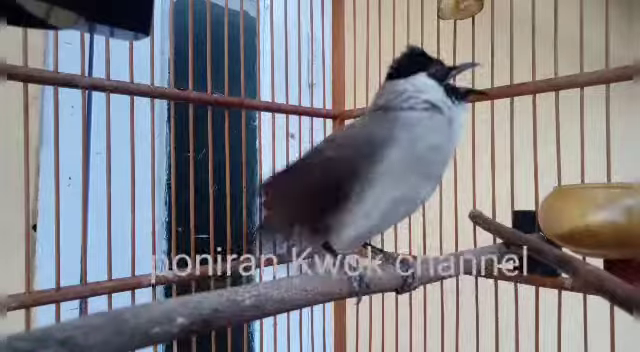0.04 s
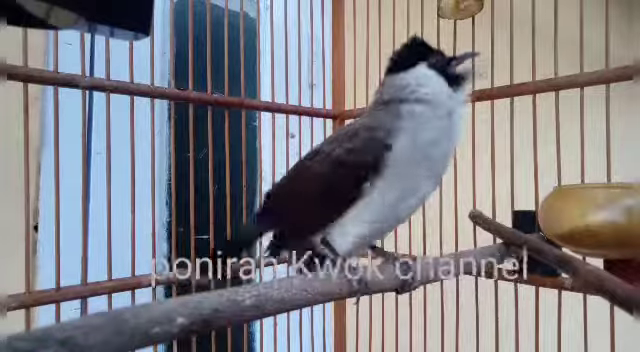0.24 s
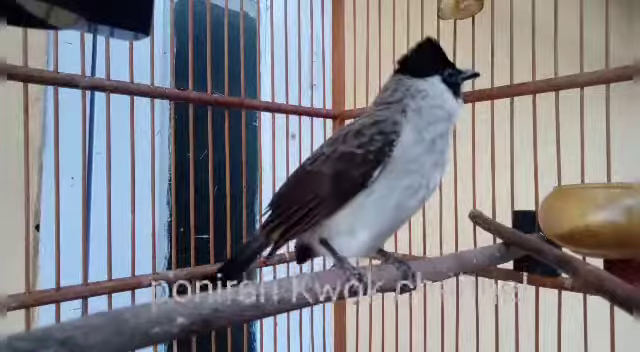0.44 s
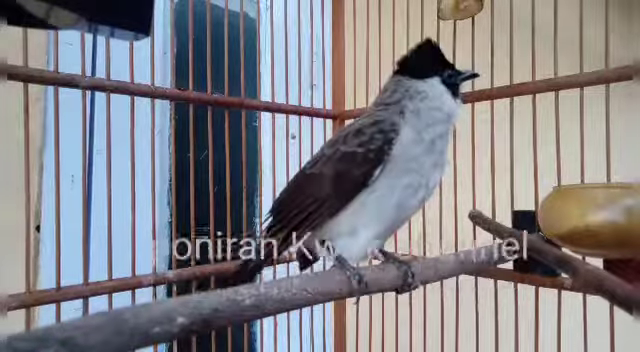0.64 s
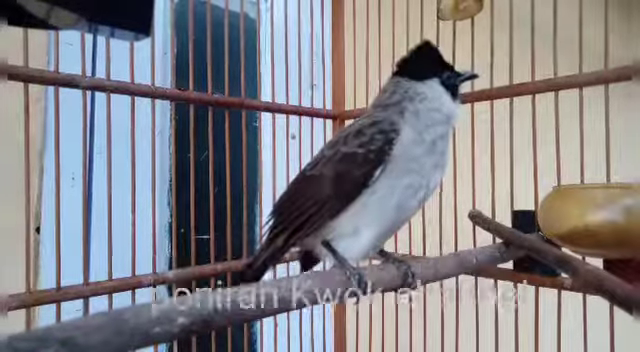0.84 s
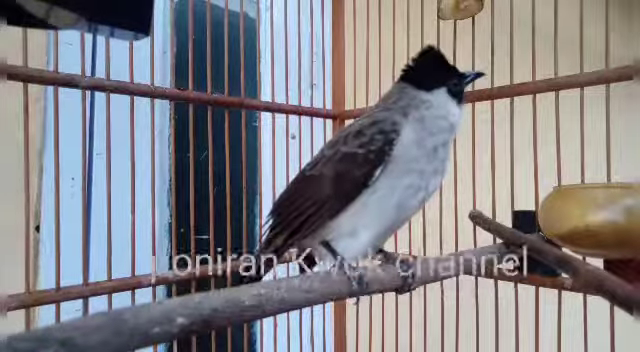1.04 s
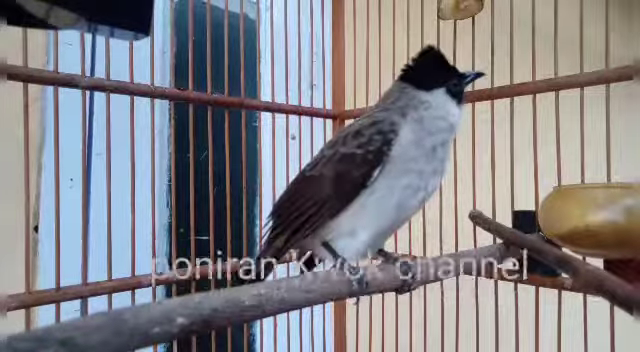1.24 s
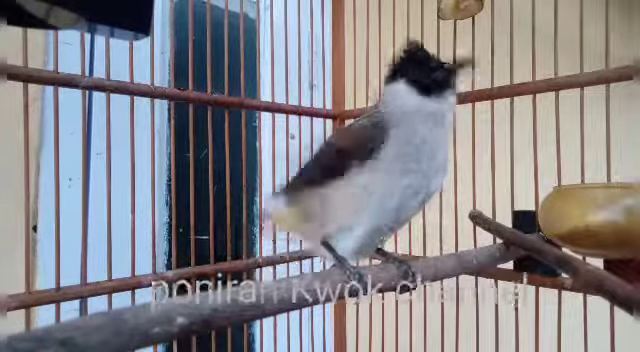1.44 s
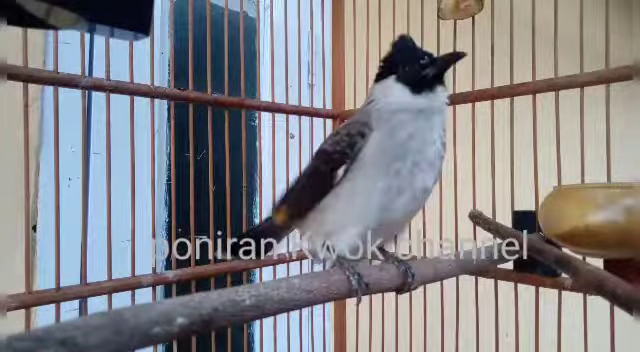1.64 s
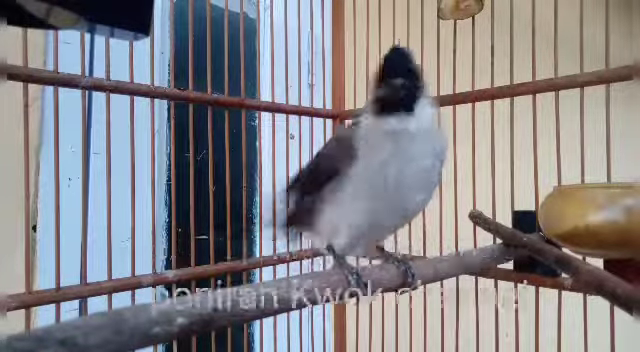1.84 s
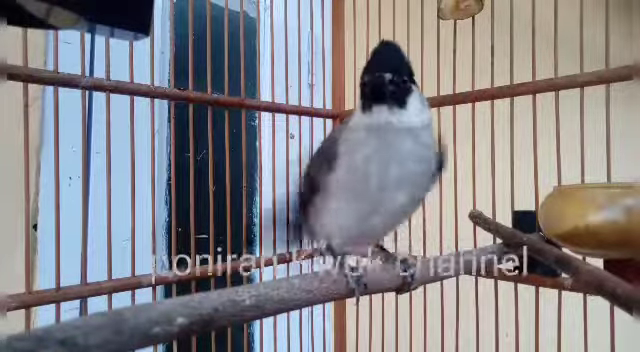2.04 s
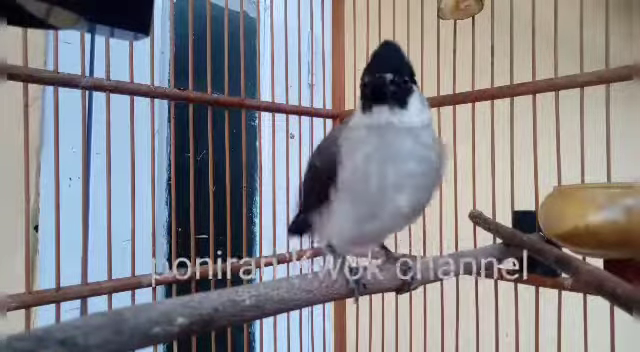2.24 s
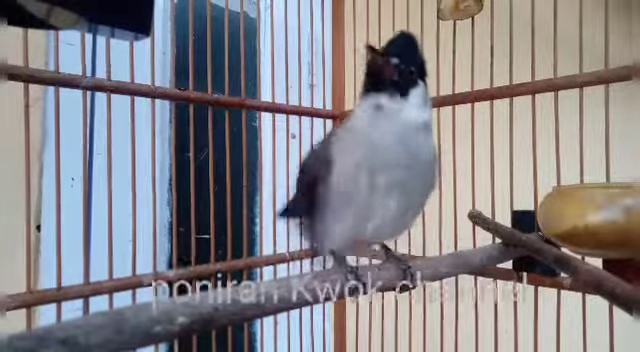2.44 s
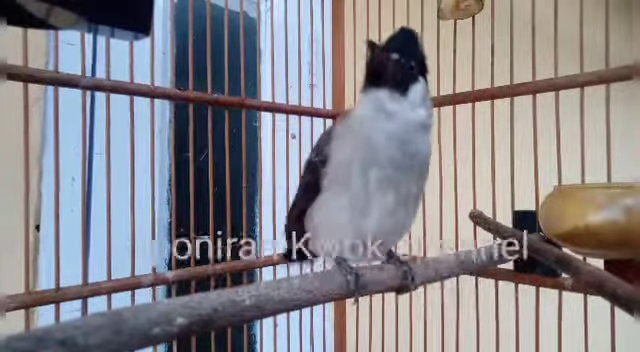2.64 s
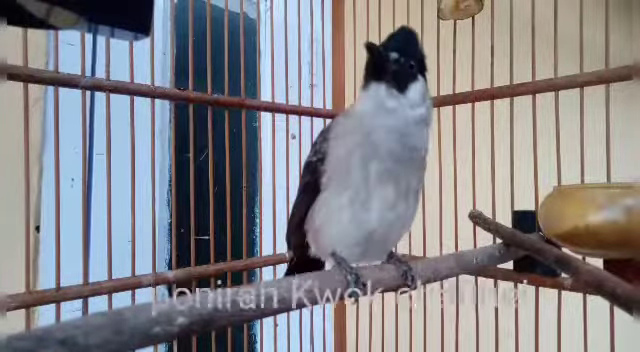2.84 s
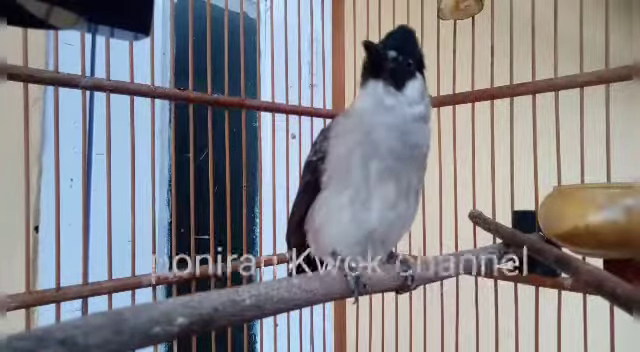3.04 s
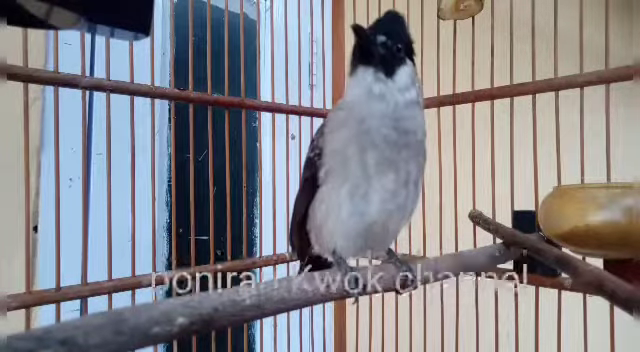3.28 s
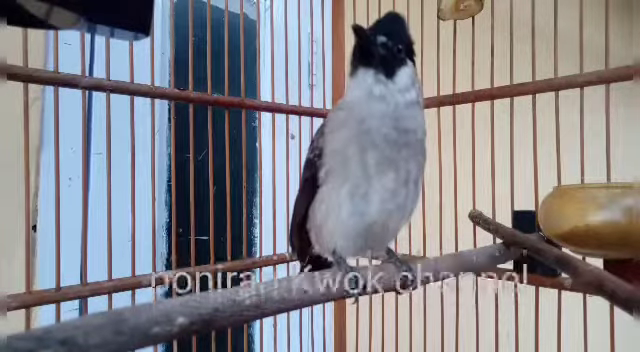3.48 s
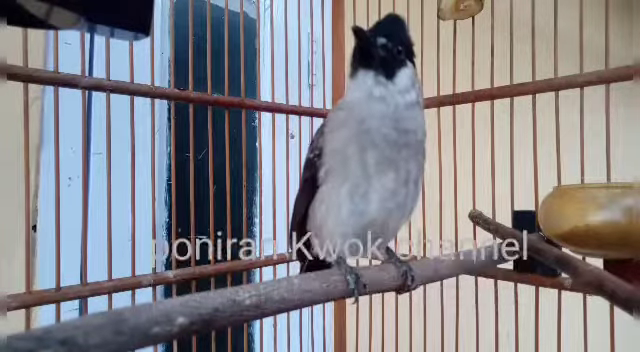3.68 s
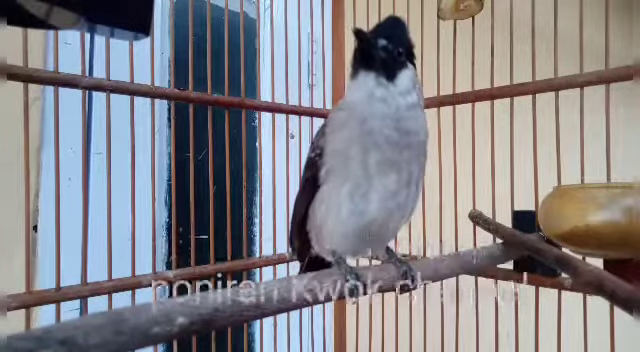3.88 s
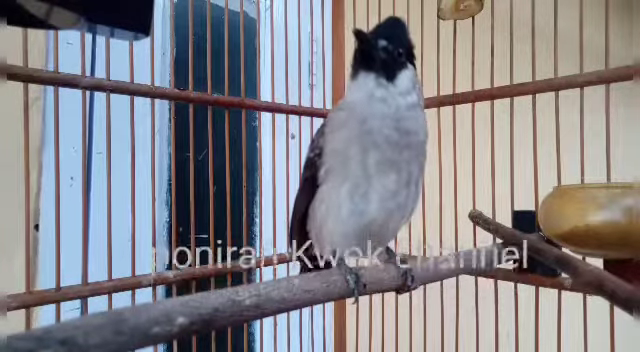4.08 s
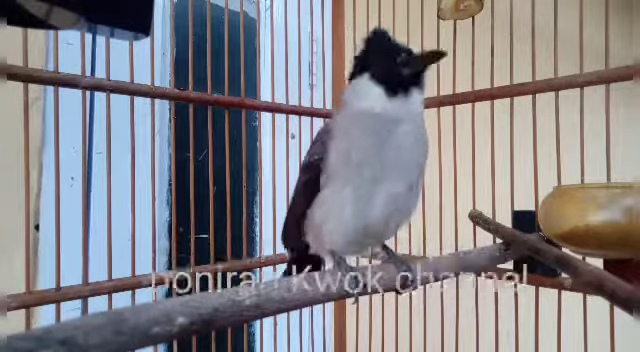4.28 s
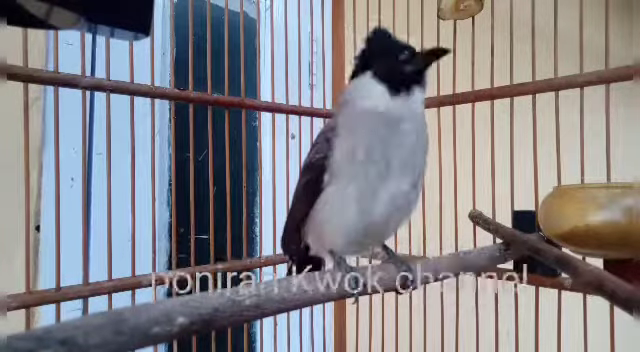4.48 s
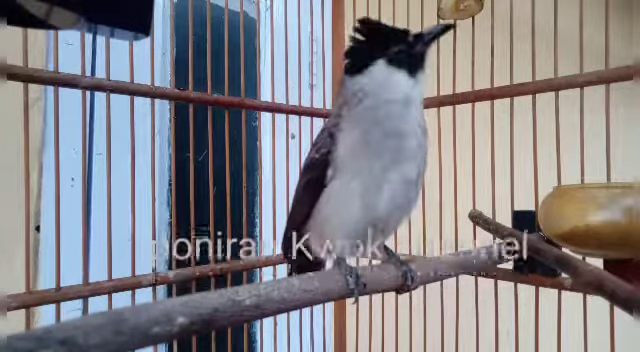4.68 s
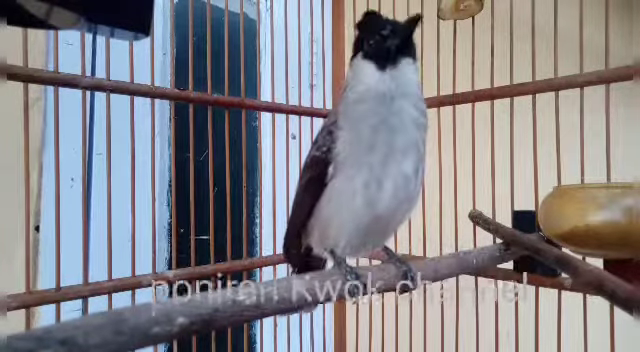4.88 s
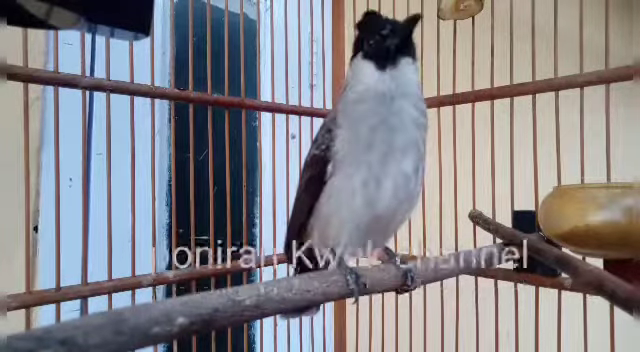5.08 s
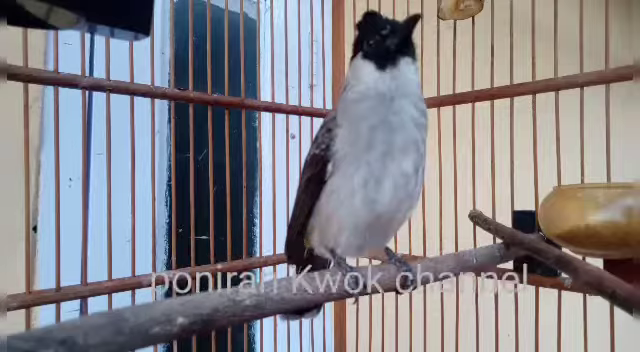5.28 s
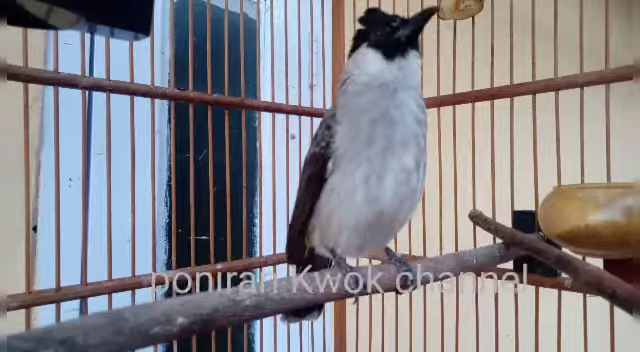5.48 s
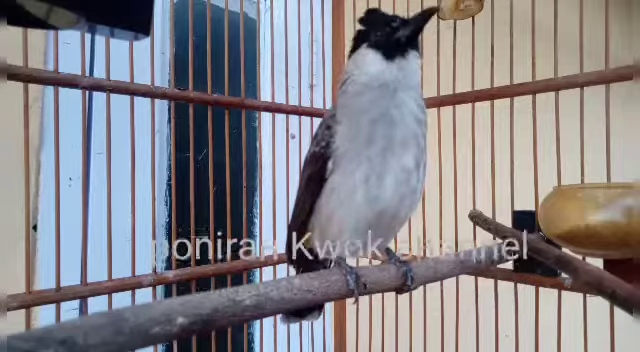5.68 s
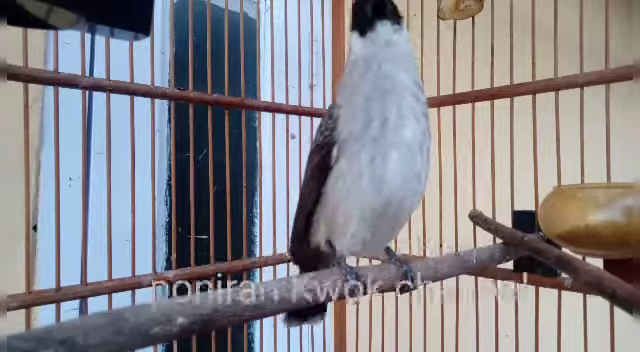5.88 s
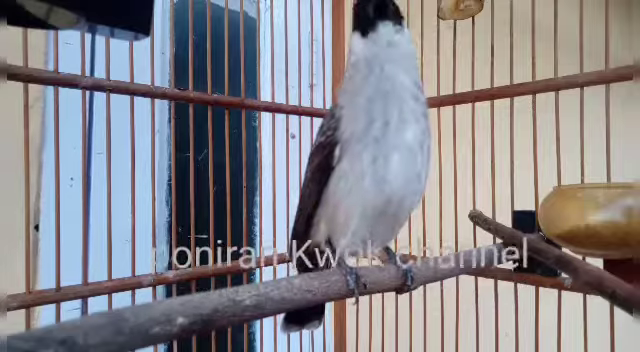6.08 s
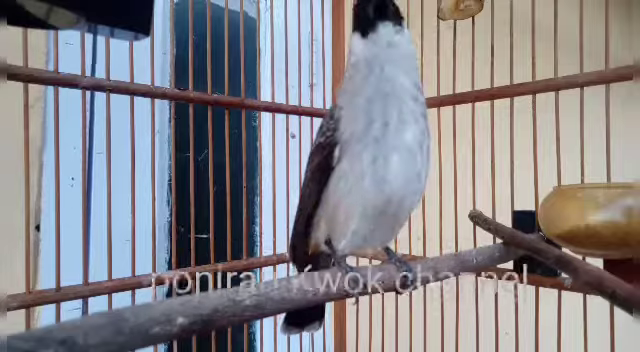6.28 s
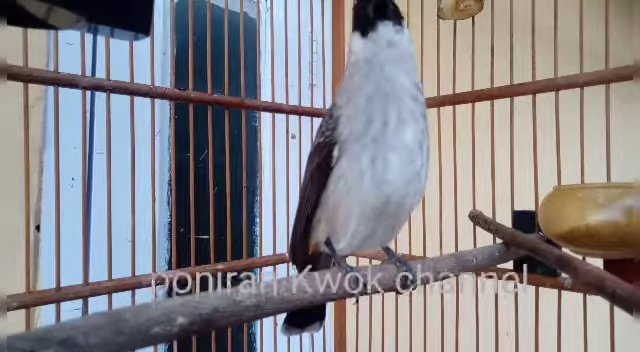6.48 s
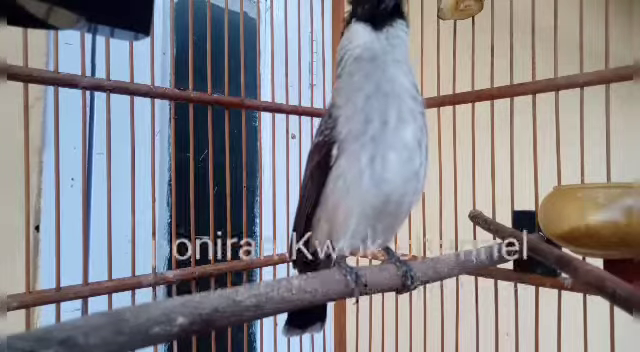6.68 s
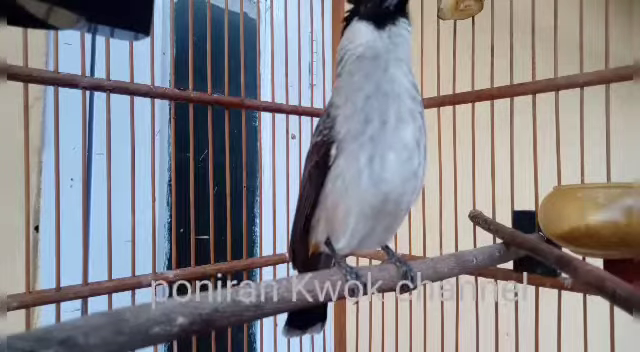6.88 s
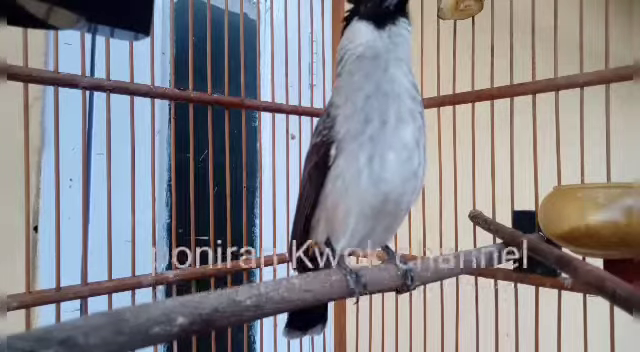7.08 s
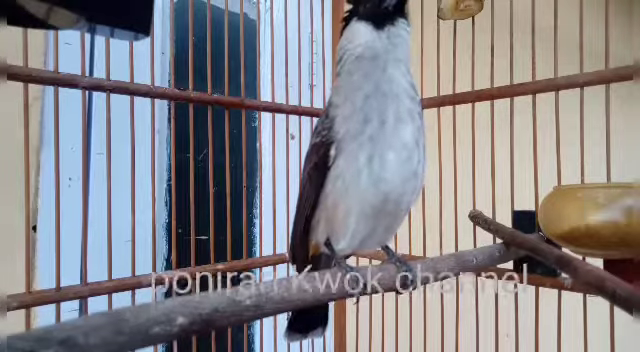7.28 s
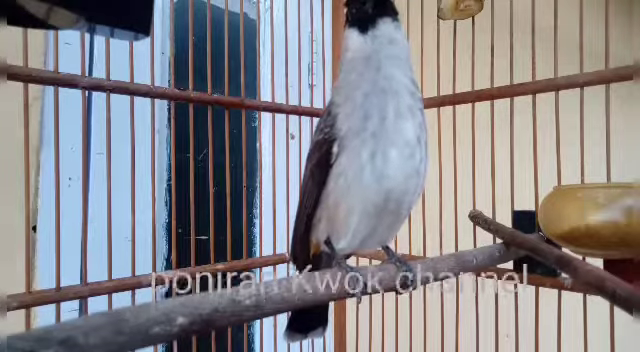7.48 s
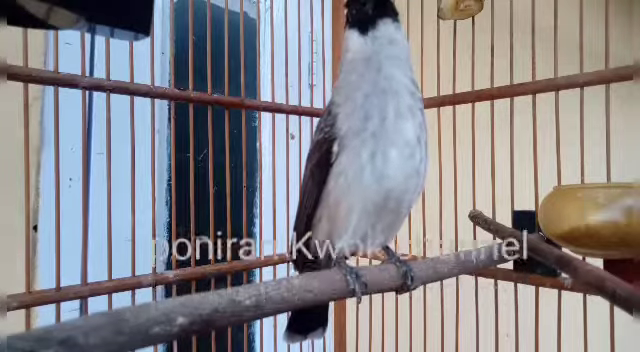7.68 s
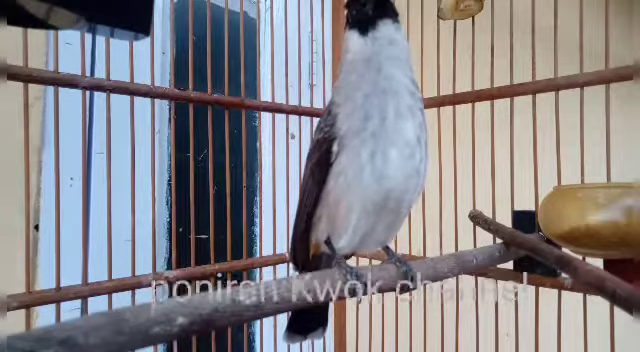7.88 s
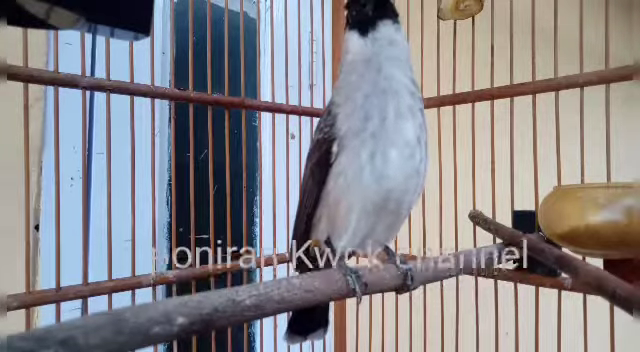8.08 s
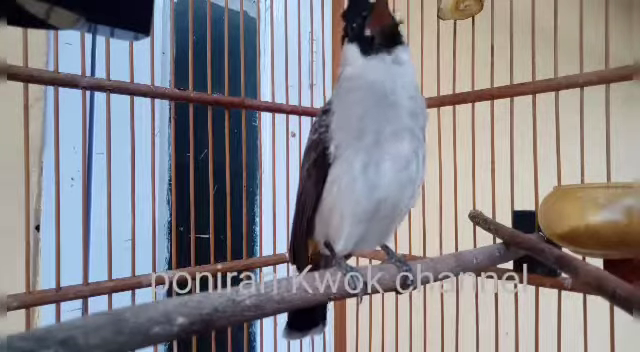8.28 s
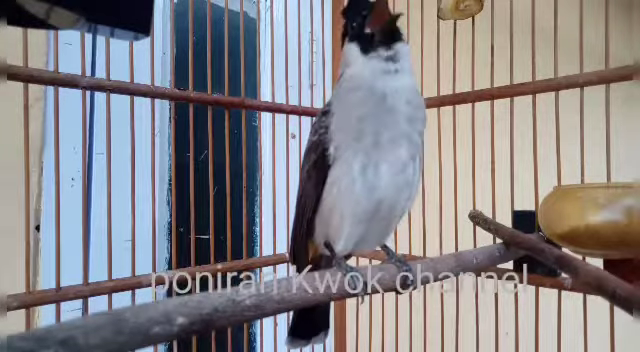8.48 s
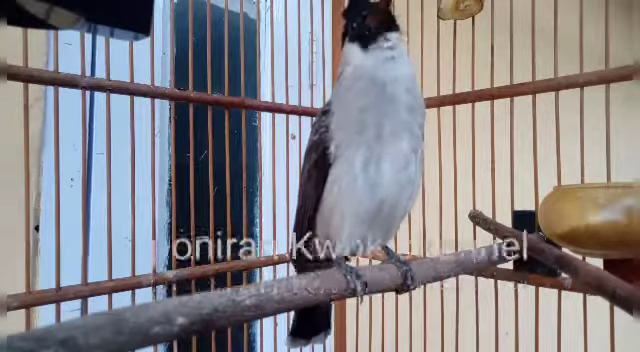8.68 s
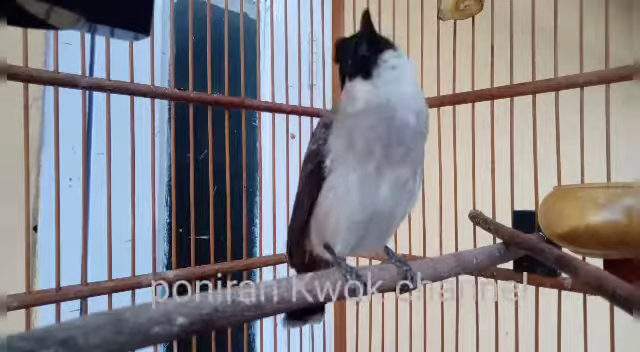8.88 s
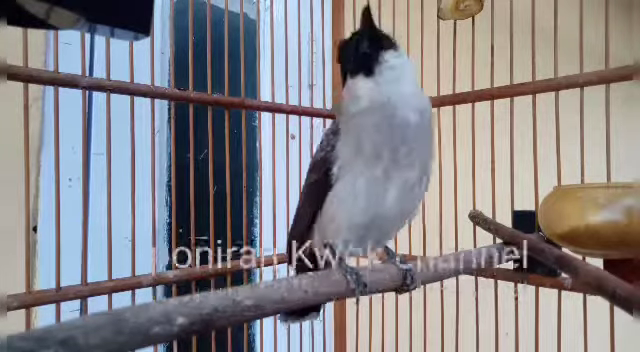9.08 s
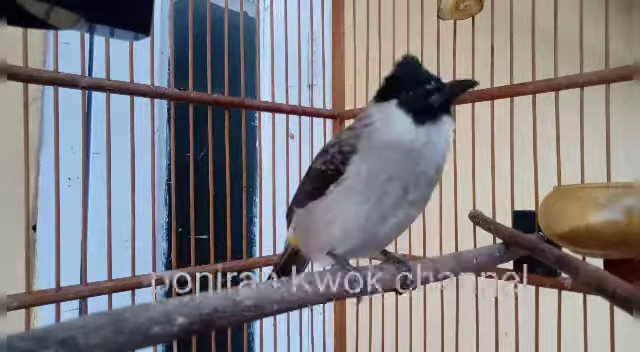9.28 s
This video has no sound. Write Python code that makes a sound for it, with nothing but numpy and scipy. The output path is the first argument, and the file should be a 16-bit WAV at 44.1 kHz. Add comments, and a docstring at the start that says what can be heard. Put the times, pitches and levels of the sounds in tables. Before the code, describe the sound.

Indoors, close to a cage: three loud, bright bird phrases under half a second each, two early and one near the end. In the quiet between, a low electrical hum comes and goes, other birds peep softly and chirp sharply mid-way, and something out of view bumps, knocks and rustles just before the last phrase. Near walls give a short, bright ring.

```python
"""A caged bulbul sings three phrases near the microphone: a buzzy trill, a held whistle, a peaked whistle.
Its voice is a stack of partials on a moving pitch, coloured by throat and beak and echoed by near walls.
Other birds chirp and call further off, built from gliding tones, overtones and hiss in the same room.
A mains hum of steady sines comes and goes over filtered-noise room air; this background is faded down
under the last phrase. Grainy noise scuffs and rustles out of view; decaying sines bump and knock."""
import sys
import numpy as np
from scipy import signal
from scipy.fft import rfft, irfft, next_fast_len
from scipy.io import wavfile
from scipy.ndimage import map_coordinates

SR = 44100
rng = np.random.default_rng(int(sys.argv[2]) if len(sys.argv) > 2 else 0)


def generate_wav(sig):
    """Save sig (samples, or channels by samples) to the path in sys.argv[1] as 16-bit PCM at SR."""
    pcm = np.round(np.clip(np.atleast_2d(sig).T, -1, 1) * 32767).astype(np.int16)
    wavfile.write(sys.argv[1], SR, pcm)


N = 411453
TIME = np.arange(N) / SR


def amp(db):
    """Turns decibels into a gain."""
    return 10 ** (np.asarray(db) / 20)


def unit(x):
    """Scales to rms 1."""
    return x / np.sqrt(np.mean(x ** 2) + 1e-20)


def add(mix, s, sound):
    """Mixes a sound in at a time in seconds."""
    part = mix[max(round(s * SR), 0):][:len(sound)]
    part += sound[:len(part)]


def play(voice, rows):
    """One sound for each row, mixed in at its time."""
    out = np.zeros(N)
    for row in rows:
        add(out, *voice(*row))
    return out


def read(points, hz):
    """Reads a table on a log-frequency axis."""
    f, value = np.transpose(points)
    return np.interp(np.log(hz + 1), np.log(f + 1), value)


def colour(x, points):
    """Filters by a table of (frequency [Hz], gain [dB])."""
    size = next_fast_len(len(x) + 1024)
    gain = amp(read(points, np.fft.rfftfreq(size, 1 / SR)))
    return irfft(rfft(x, size) * gain, size)[:len(x)]


def waver(count, hz):
    """Smooth random motion of rms near 1, with changes up to about hz."""
    spacing = SR / (2 * hz)
    knots = rng.standard_normal(int(count / spacing) + 4)
    return map_coordinates(knots, [np.arange(count) / spacing], order=2, mode="nearest")


def resonate(x, hz, width):
    """A resonance of gain 1 at its peak."""
    return signal.lfilter(*signal.iirpeak(hz, hz / width, SR), x)


def step(t, at, width):
    """A smooth step from 0 to 1."""
    return .5 + .5 * np.tanh((t - at) / width)


def bell(t, at, width):
    """A smooth bump of height 1."""
    return np.exp(-((t - at) / width) ** 2)


def gate(t, attack, release):
    """Attack, hold and release over the span of t."""
    return np.clip((t - t[0]) / attack, 0, 1) * np.clip((t[-1] - t) / release, 0, 1)


def room(x):
    """Diffuse ring: sparse taps of random sign, each band dying at its own speed."""
    # ring of the room: (frequency [Hz], t60 [s])
    ring_times = [(200, 0.18), (2500, 0.57), (4500, .52), (8000, .43), (15000, 0.45)]
    # colour of the ring: (frequency [Hz], gain [dB])
    ring_colour = [(200, 1), (1500, -0.5), (2300, -1), (3100, 0), (4200, -2), (5300, 1.5), (6300, -1),
                   (8000, 0.5), (15000, -2)]
    taps = rng.choice([-1., 1.], SR) * (rng.random(SR) < 1 / 10)
    hz, t, bands = signal.stft(taps, SR, nperseg=256)
    t60 = read(ring_times, hz)[:, None]
    # the near corner answers first and dies fast
    near_corner = amp(-0.5) * amp(-60 * t / 0.22)
    decay = amp(-60 * t / t60) + near_corner
    tail = signal.istft(bands * decay, SR, nperseg=256)[1][:SR]
    tail = tail * np.clip((TIME[:SR] - .003) / 0.01, 0, 1)
    return signal.oaconvolve(x, colour(tail / np.linalg.norm(tail), ring_colour))[:N]


def background():
    """Noise-like room air with a faint whine and drone in it, and a slightly wavering mains hum."""
    # spectrum of the room air: (frequency [Hz], relative level [dB])
    air_spectrum = [(20, -22), (45, -16), (75, -3.5), (125, 3.5), (170, -4.5), (260, -6.5), (420, -8.5),
                    (650, -10.5), (1100, -15.5), (2200, -18), (3600, -17.5), (5200, -28.5), (7800, -23.5),
                    (10500, -38), (15500, -42.5)]
    # level of air and whine together, faded down under the last phrase: (time [s], level [dB])
    air_level = [(0, -56), (1.5, -57.5), (2.6, -53), (3.3, -57), (4.2, -57), (6, -55), (8.35, -54),
                 (8.55, -63.5), (8.9, -65), (9.3, -81)]
    # harmonics of the hum: (frequency [Hz], relative level [dB])
    hum_lines = [(100, -3), (200, -19), (300, -27)]
    # spells of hum: (on [s], off [s], level at on [dB], growth [dB/s], fade time constant [s])
    hum_spells = [(-.3, 2.56, -51, .6, 0.15), (4.17, 8.36, -48.5, 0.83, .03)]
    whine_hz, whine_db = 1666, -16.5  # dB against the air
    drone_hz, drone_db, drone_off_s = 253.7, -70, 3.637
    swell_s = .12

    drift = TIME + 0.00022 * waver(N, 1.0)  # a slightly uneven clock for the tones
    whine = amp(whine_db) * np.sin(2 * np.pi * whine_hz * drift) * (1 + .5 * waver(N, 12))
    air = unit(colour(rng.standard_normal(N), air_spectrum)) + whine
    air = air * amp(np.interp(TIME, *np.transpose(air_level)) + .5 * waver(N, 5))

    drone = amp(drone_db + 2 * waver(N, 3)) * np.sqrt(2) * np.sin(2 * np.pi * drone_hz * drift)
    drone = drone * (1 - step(TIME, drone_off_s, swell_s))

    hum = np.sqrt(2) * sum(amp(db) * np.sin(2 * np.pi * hz * drift) for hz, db in hum_lines)
    spells = np.zeros(N)
    for on, off, db, growth_db, fade_s in hum_spells:
        fade = np.exp(-np.maximum(TIME - off, 0) / fade_s)
        spells += amp(db + growth_db * (TIME - on)) * step(TIME, on, swell_s) * fade
    return air + drone + hum * spells * amp(1.2 * waver(N, 1.7))


def syrinx(hz, partials):
    """The membranes swing at the pitch and give a stack of partials, kept below half the sample rate."""
    phase = 2 * np.pi * np.cumsum(hz) / SR
    return np.sqrt(2) * sum(amp(db) * np.sin(k * phase) * (k * hz < SR / 2) for k, db in partials)


def trill(start, length, creak, top_hz, db, fall_db, rate, swing, rasp, throb_db):
    """A rough creak catches into a fast warble, strongest in the troughs of the pitch."""
    # partials of the trill: (multiple of the pitch [ratio], level [dB])
    trill_partials = [(1, -8.5), (2, 0), (3, -22.5), (4, -23.5), (5, -25.5), (6, -39), (7, -41.5),
                      (8, -41.5)]
    foot_hz, top_share = 1388, .69  # the top of the arch comes at this share of the length
    attack_s, catch_s, release_s = 0.0084, 0.0018, .019
    creak_db, creak_rough = -4.5, .7

    age = np.arange(0, length, 1 / SR)
    caught = step(age, creak, catch_s)
    arch = 1 - (1 - age / length / top_share) ** 2
    hz = foot_hz + (top_hz - foot_hz) * caught * arch
    level = db - fall_db * age / length + creak_db * (1 - caught)
    gain = amp(level) * gate(age, attack_s, release_s) ** 1.1
    warble = -np.cos(2 * np.pi * rate * age) * caught * np.clip(age / 0.017, 0, 1)
    rough = rasp + creak_rough * (1 - caught)
    hz = hz * (1 + swing * warble + 0.077 * rough * waver(len(age), 1100))
    flutter = 1 + 0.47 * rough * waver(len(age), 1500)
    hiss = amp(-21) * rough * rng.standard_normal(len(age))
    return start, gain * amp(-throb_db * warble) * (syrinx(hz, trill_partials) * flutter + hiss)


def whistle(hz, gain, overtone_db):
    """A nearly pure tone; faint overtones flicker, and stand out where it is blown weakly."""
    # overtones: (multiple of the guide pitch [ratio], level [dB])
    whistle_partials = [(.5, -41), (1.5, -38), (2, -29.5), (3, -36.5), (4, -49), (5, -42.5), (6, -45.5)]
    flicker_db = 3.5
    count, weak = len(hz), 1 - gain / gain.max()
    hz = hz * (1 + (0.002 + 0.0086 * weak ** 2) * waver(count, 600))
    overtones = np.zeros(count)
    for partial in whistle_partials:
        overtones += syrinx(hz, [partial]) * amp(flicker_db * waver(count, 45))
    hiss = amp(-47.5) * rng.standard_normal(count)
    reedy = amp(overtone_db + 21 * weak ** 3)
    main_tone = syrinx(hz, [(0.9877, 0)])  # sounds just under the guide pitch
    return gain * amp(.7 * waver(count, 70)) * (main_tone + reedy * (overtones + hiss))


def held_whistle(s, flick_hz, flick_db, wait, length, held_hz, held_db, overtone_db):
    """A pure flick, a low soft wait, then a level tone that lifts once and settles lower."""
    # pitches here are guide pitches, and shares are of the held one
    flick_s, wait_pitch, wait_db, swell_s = 0.0043, .86, -13.5, .003
    lift_at_s, lift_s, lift_share, lift_db = .048, .005, 0.078, 2.5
    settle_at_s, settle_share, settle_db, release_s = .057, 0.084, -3.5, 0.0044

    t = np.arange(-2 * flick_s, length, 1 / SR)
    flick, waiting = bell(t, 0, flick_s), 1 - step(t, wait, swell_s)
    lift, settled = bell(t, lift_at_s, lift_s), step(t, settle_at_s, swell_s)
    hz = held_hz * (1 - (1 - wait_pitch) * waiting + lift_share * lift - settle_share * settled)
    db = held_db + wait_db * waiting + lift_db * lift + settle_db * settled
    gain = amp(db + (flick_db - db) * flick) * gate(t, 2 * flick_s, release_s) ** 2
    return s + t[0], whistle(hz + (flick_hz - hz) * flick, gain, overtone_db - 13 * waiting)


def peaked_whistle(s, fall, shoulder_hz, db, overtone_db):
    """A quick climb to a loud, sharp cusp, then a softer fall that turns reedy."""
    # guide pitches; the cusp and the final droop are shares of the pitch
    climb_s, foot_hz, tail_hz = .026, 1680, 2300
    cusp_share, cusp_s, droop_share, droop_s = .16, .004, .11, .005
    # loudest just ahead of the cusp, with soft flanks
    loud_lead_s, loud_s, flank_db, flank_db_per_s = .003, 0.019, -12.5, -90
    attack_s, release_s = 0.0049, 0.0074

    t = np.arange(-climb_s, fall, 1 / SR)
    climb, slide = np.clip(-t / climb_s, 0, 1), np.clip(t / fall, 0, 1)
    hz = shoulder_hz + (foot_hz - shoulder_hz) * climb ** 1.7 + (tail_hz - shoulder_hz) * slide ** 0.99
    cusp = cusp_share * np.exp(-abs(t) / cusp_s)
    droop = droop_share * np.exp((t - fall) / droop_s)
    hz = hz * (1 + cusp - droop)
    level = db + flank_db * (1 - bell(t, -loud_lead_s, loud_s)) + flank_db_per_s * abs(t)
    gain = amp(level) * gate(t, attack_s, release_s)
    return s + t[0], whistle(hz, gain, overtone_db - 7 + 20 * slide ** 1.1)


def bulbul():
    """Three phrases from close by, with echoes off the walls beside the cage."""
    # trills that open the phrases: (start [s], length [s], creak before the warble [s], top pitch [Hz],
    # level [dB], fall over the length [dB], warble rate [Hz], pitch swing [share], rasp [0-1],
    # level throb [dB])
    trills = [(.031, .1, .012, 2173, -14, 8, 133.5, .11, 0.3, 4),
              (2.3435, 0.0968, .021, 1945, -17, 5.5, 110, 0.14, 0.3, 1),
              (8.238, .105, .006, 2092, -18, -2.5, 111, .07, .06, 0.5)]
    # held whistles: (time of the flick [s], flick guide pitch [Hz], flick level [dB],
    # wait before the swell [s], end after the flick [s], held guide pitch [Hz], held level [dB],
    # overtones [dB])
    holds = [(.196, 2918, -14, .013, .074, 2595, -12, 2.5),
             (2.502, 2775, -21.5, 0.015, 0.068, 2440, -14, -0.5),
             (8.402, 3008, -12.5, 0.016, 0.0709, 2523, -13, -2.5)]
    # peaked whistles that end the phrases: (time of the peak [s], fall [s], shoulder guide pitch [Hz],
    # level [dB], overtones before the reedy change [dB])
    peaks = [(.304, 0.05, 2954, -10.5, 1), (2.608, .059, 2775, -11.5, -0.5),
             (8.511, .05, 3004, -12.5, -0.5)]
    # colour of throat and beak: (frequency [Hz], gain [dB])
    beak = [(900, -13), (1450, -9), (1950, -0.5), (2500, 0), (3800, 1), (4700, -4.5), (5500, -6),
            (6400, -9.5), (7800, 2), (8600, -4), (9300, -3.5), (10900, -12.5), (12200, -4), (13000, 3),
            (15500, -1)]
    # echoes off the near walls: (delay [ms], level [dB])
    echoes = [(3.4, -15), (6.1, -17), (9.3, -20), (14.5, -29)]
    song = play(trill, trills) + play(held_whistle, holds) + play(peaked_whistle, peaks)
    song = colour(song, beak)
    heard = song + amp(-17.5) * room(song)
    for ms, db in echoes:
        add(heard, ms / 1000, amp(db) * song)
    return heard


def bumps():
    """Soft dull bumps, each one low, uneven ring that swells briefly and decays."""
    # the bumps: (start [s], frequency [Hz], level [dB], t60 [s])
    bump_rows = [(1.19, 348, -39, 0.11), (6.578, 93, -32.5, 0.42), (7.069, 310, -43.5, 0.34)]
    swell_s = .022
    out, t = np.zeros(N), TIME[:SR // 2]
    swell = np.sin(np.pi / 2 * np.minimum(t / swell_s, 1)) ** 2
    for s, hz, db, t60 in bump_rows:
        ring = np.sin(2 * np.pi * hz * t + 0.6 * waver(len(t), hz / 6))
        ring = ring * (1 + 0.3 * waver(len(t), hz / 6))
        add(out, s, ring * amp(db - 60 * t / t60) * swell)
    return out


def scuffs():
    """Grainy friction strokes, part hollow body and part hiss."""
    # strokes: (start [s], length [s], level [dB], fall over the length [dB], hiss share of power [0-1])
    strokes = [(1.849, 0.1174, -50, 8, 0.46), (1.989, 0.107, -50.5, 4.5, 0.57),
               (2.276, 0.167, -48.5, 2, 0.08), (2.442, 0.1277, -41.5, 5, 0.2),
               (2.813, 0.09, -53.5, -5, 0.4), (2.945, 0.1246, -53, 4, 0.2), (3.727, 0.14, -57, 3.5, 1),
               (6.718, 0.43, -43, 21, 0.16), (7.031, 0.081, -43.5, 2, 0.01), (7.118, 0.113, -54, 5.5, 0),
               (7.608, 0.12, -43.5, 7.5, 0.05), (7.736, 0.34, -40, 24, 0.17),
               (8.017, 0.1232, -35, 6.5, 0.08), (8.145, 0.2273, -38, 11.5, 0.19)]
    # spectra of the dull body and of the hiss: (frequency [Hz], relative level [dB])
    body_spectrum = [(40, -18.5), (90, -0.5), (220, -4.5), (420, -3), (900, -4), (1500, -3), (2200, -9.5),
                     (3600, -12.5), (5000, -19), (15000, -40.5)]
    hiss_spectrum = [(300, -21), (1500, -3), (3700, 3), (5200, -5.5), (7800, 4.5), (10000, -11),
                     (15000, -19.5)]
    # hollow resonances that the scuffs stir: (frequency [Hz], width [Hz], level [dB])
    hollow_modes = [(589.5, 38, 6), (623, 45, 7), (847, 70, 2.5), (1140, 66, -2.5), (1450, 260, -1.5),
                    (2851, 130, 1.5)]

    grit = rng.standard_normal(N) * amp(2.1 * waver(N, 120))
    body = colour(grit, body_spectrum)
    body = unit(body + sum(amp(db) * resonate(body, hz, width) for hz, width, db in hollow_modes))
    hiss = unit(colour(grit[::-1], hiss_spectrum))  # grit read backwards, so it differs from the body
    out = np.zeros(N)
    for s, length, db, fall_db, share in strokes:
        age = TIME[:int((length + .1) * SR)] / length
        attack = np.minimum(age * length / 0.011, 1)
        die_away = np.exp(-np.maximum(age - 1, 0) * length / .02)
        stroke = amp(db - fall_db * np.minimum(age, 1)) * attack * die_away
        share = np.clip(share, 0, 1)
        part = slice(int(s * SR), int(s * SR) + len(age))
        add(out, s, stroke * (np.sqrt(1 - share) * body[part] + np.sqrt(share) * hiss[part]))
    return amp(-1.5) * out + amp(-2) * room(out)


def call(hz, gain, rough, overtone_db):
    """Another bird's voice; roughness shakes its pitch and level and adds a hiss."""
    # overtones: (multiple of the pitch [ratio], level [dB])
    chirp_partials = [(2, -9.5), (3, -24.5)]
    # rush of air in a harsh chirp: (multiple of the median pitch [ratio], relative level [dB])
    chirp_hiss = [(.55, -35), (.8, -6.5), (1.2, 8.5), (2.2, -6), (2.7, -13), (4, -12)]
    count = len(hz)
    hiss_spectrum = np.multiply(chirp_hiss, [np.median(hz), 1])
    hiss = amp(-10.0) * rough * unit(colour(rng.standard_normal(count), hiss_spectrum))
    hz = hz * (1 + 0.1 * rough * waver(count, 900))
    pure = syrinx(hz, [(1, 0)])
    shake = 1 + .5 * rough * waver(count, 400)
    return gain * shake * (pure + amp(overtone_db) * (syrinx(hz, chirp_partials) + hiss))


def chirp(s, length, first_hz, turn_hz, last_hz, db, rough, overtone_db):
    """The pitch swings into a turning point, where the call is loudest, and out again."""
    turn_share, edge_db = .42, -12  # the turn as a share of the length
    t = np.arange(0, length, 1 / SR)
    before = np.clip(1 - t / length / turn_share, 0, 1) ** 2
    after = np.clip((t / length - turn_share) / (1 - turn_share), 0, 1) ** 1.5
    hz = turn_hz + (first_hz - turn_hz) * before + (last_hz - turn_hz) * after
    glide = abs(hz / turn_hz - 1)  # the voice is weaker away from its turning pitch
    gain = amp(db + edge_db * (.5 * (before + after) + 2 * glide)) * gate(t, .0005, 0.0024)
    return s, call(hz, gain, rough, overtone_db)


def peep(s, length, first_hz, last_hz, db, rough, overtone_db):
    """A straight glide that swells and fades."""
    t = np.arange(0, length, 1 / SR)
    edge_db = -5
    gain = amp(db + edge_db * (2 * t / length - 1) ** 2) * gate(t, .002, .02)
    return s, call(first_hz + (last_hz - first_hz) * t / length, gain, rough, overtone_db)


def neighbours():
    """A nearby bird's sharp chirps, and far calls heard mostly through the room."""
    # scooped or arched chirps: (start [s], length [s], first pitch [Hz], turning pitch [Hz],
    # last pitch [Hz], level before the mix [dB], roughness [0-1], overtones [dB])
    chirps = [(2.161, 0.0117, 6300, 6717, 6380, -29, 0.3, -4),
              (2.159, 0.0067, 8300, 7970, 7900, -37.5, .4, -8.5),
              (2.167, 0.02815, 6080, 5008, 5660, -26, 0.2, -6.5),
              (6.296, 0.022, 3120, 2490, 2950, -33.5, 0.64, 6.5),
              (6.315, .04, 5560, 3905, 3931, -21.5, 0.44, 3.5),
              (6.334, 0.022, 5870, 6268, 6730, -26, .35, -4.5),
              (6.397, 0.031, 2540, 2154, 1880, -40, 0.77, 4.5),
              (6.418, 0.031, 2318, 2847, 2730, -28.5, 0.62, 1),
              (6.44, .06, 5084, 3917, 5020, -22, 0.46, -1.5)]
    # soft far calls: (start [s], length [s], first pitch [Hz], last pitch [Hz],
    # level before the mix [dB], roughness [0-1], overtones [dB])
    peeps = [(3.10, 0.234, 6040, 6180, -63, 0.25, -16.5), (3.734, 0.132, 3900, 3760, -65, .3, 14),
             (4.996, 0.075, 2888, 3050, -47.5, 0.18, -11), (5.014, .04, 3354, 3307, -32.5, 0.1, -18),
             (5.069, 0.078, 3258, 3228, -30.5, 0.04, -18.5), (5.458, 0.16, 5500, 5570, -58, 0.31, -7.5),
             (5.47, 0.13, 2816, 2714, -60, 0.33, -21), (5.576, 0.087, 2370, 1840, -53.5, 0.88, -26.5),
             (5.897, 0.032, 7000, 6550, -46.5, 0.53, -10.5), (5.927, 0.0413, 5856, 5800, -54, 0.38, -3),
             (5.93, 0.13, 2852, 2934, -52.5, 0.19, 7.5), (5.979, .08, 4950, 4800, -53, 0.3, -11),
             (6.029, .15, 3823, 3770, -48, 0.19, -6.5), (6.19, 0.072, 3930, 4650, -51, 0.53, -12),
             (7.798, 0.177, 2604, 2436, -40.5, 0.83, -25), (8.708, 0.1654, 3460, 3884, -52, 0.74, -11),
             (9.028, .16, 3064, 3260, -63.5, 0.9, -14)]
    near, far = play(chirp, chirps), play(peep, peeps)
    direct = amp(1) * near + amp(-14.5) * far
    return direct + amp(-2.0) * room(near + far)


def thin_ring():
    """Noise through two equal resonances: a thin, faint treble band that swells and fades."""
    centre_s, half_s, ring_hz, ring_db = 4.1, 0.61, 3530, -68
    band = resonate(resonate(rng.standard_normal(N), ring_hz, 150), ring_hz, 150)
    return amp(ring_db) * bell(TIME, centre_s, half_s) * unit(band)


def knock():
    """One light, hollow knock across the room, a cluster of decaying modes."""
    # modes of the knock: (frequency [Hz], relative level [dB], t60 [s])
    knock_modes = [(871, 0, 0.25), (971, -1.5, 0.17), (1086, 0, 0.15), (1240, 2, 0.13), (1577, -9.5, .1),
                   (2070, -9.5, 0.066)]
    knock_s, knock_db = 7.609, -38  # level before the mix
    out, t = np.zeros(N), TIME[:SR // 2]
    ring = sum(amp(db - 60 * t / t60) * np.sin(2 * np.pi * hz * t) for hz, db, t60 in knock_modes)
    add(out, knock_s, amp(knock_db) * ring * gate(t, 0.0106, .1) * (1 + 0.44 * waver(len(t), 60)))
    return amp(-1.5) * out + amp(-1.5) * room(out)


def scene():
    """Everything as heard at one microphone beside the cage."""
    mix = background() + bulbul() + bumps() + scuffs() + neighbours() + thin_ring() + knock()
    return mix[None]


def record(dry):
    """A short fade at the end, then the band limit."""
    edge_hz = 15620
    fade = np.clip((TIME[-1] - TIME) / 0.12, 0, 1) ** 3
    low_pass = signal.firwin(511, edge_hz, window=("kaiser", 9), fs=SR)
    return signal.oaconvolve(dry * fade, low_pass[None], "same")


dry = scene()
out = record(dry)
generate_wav(out)
```